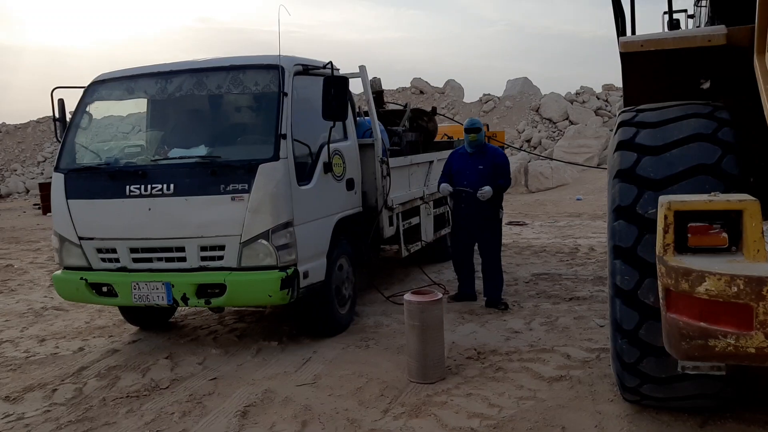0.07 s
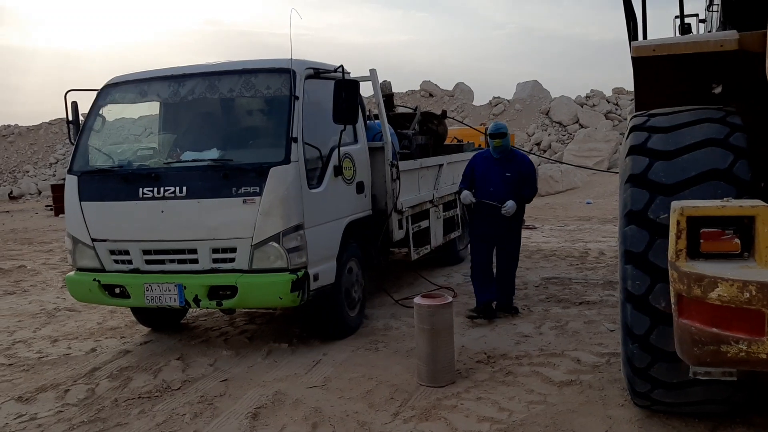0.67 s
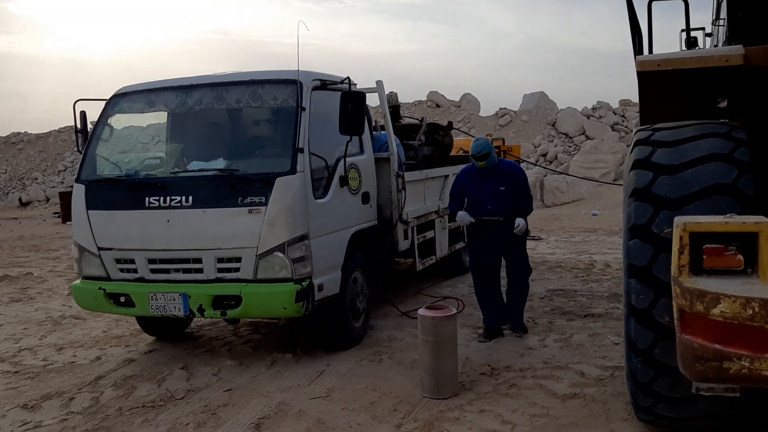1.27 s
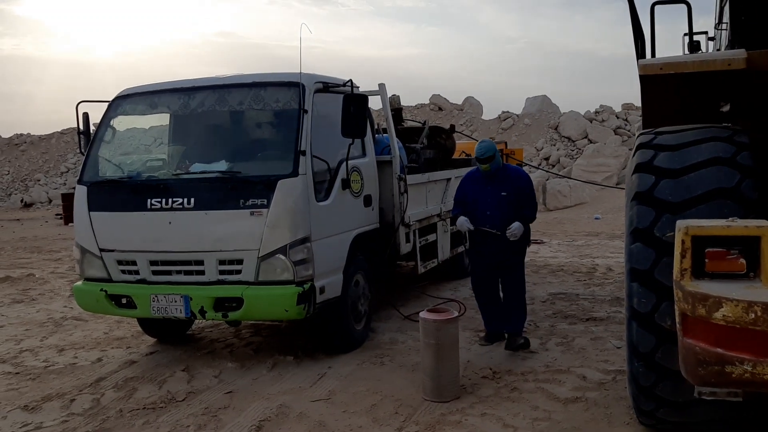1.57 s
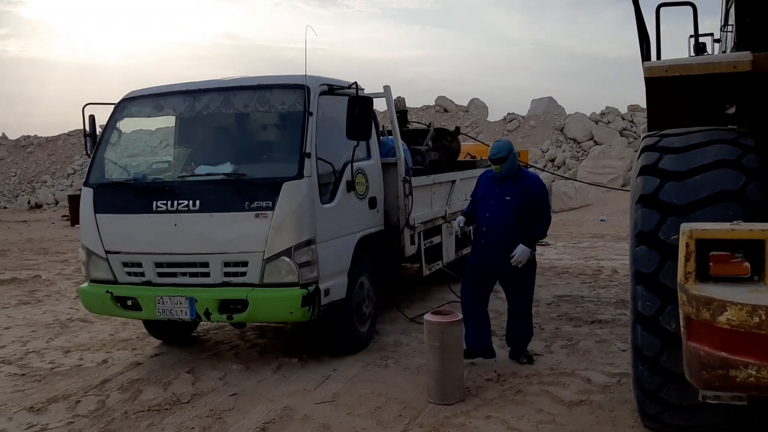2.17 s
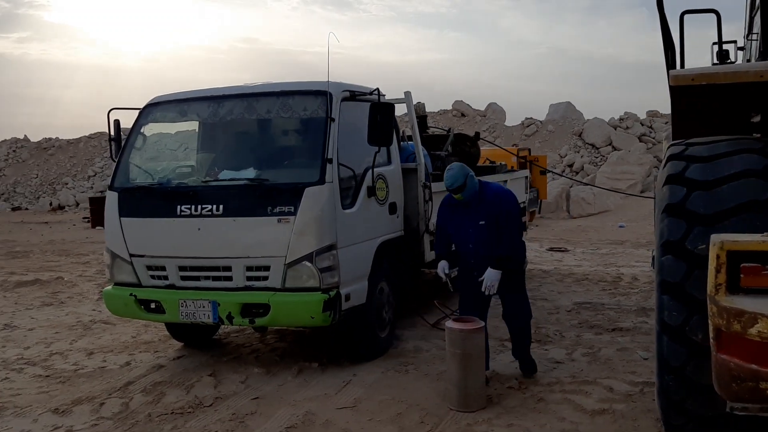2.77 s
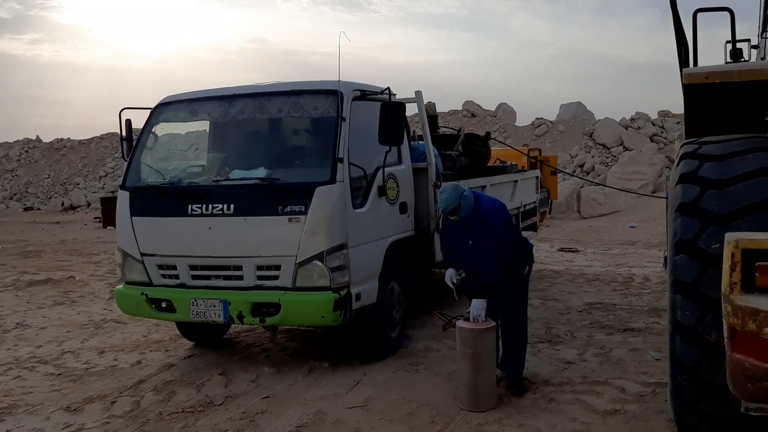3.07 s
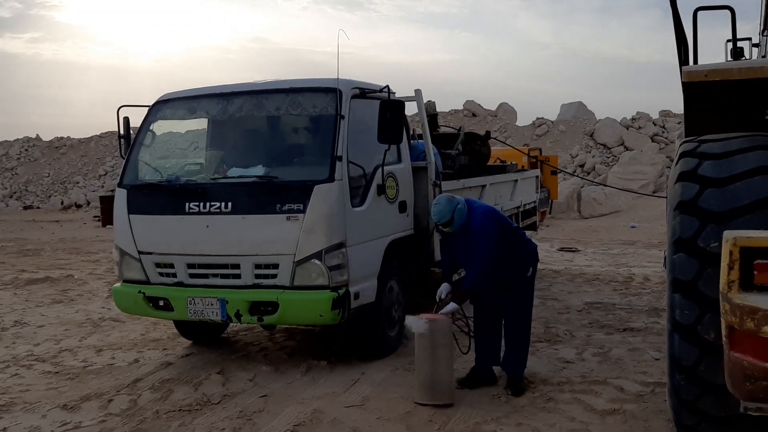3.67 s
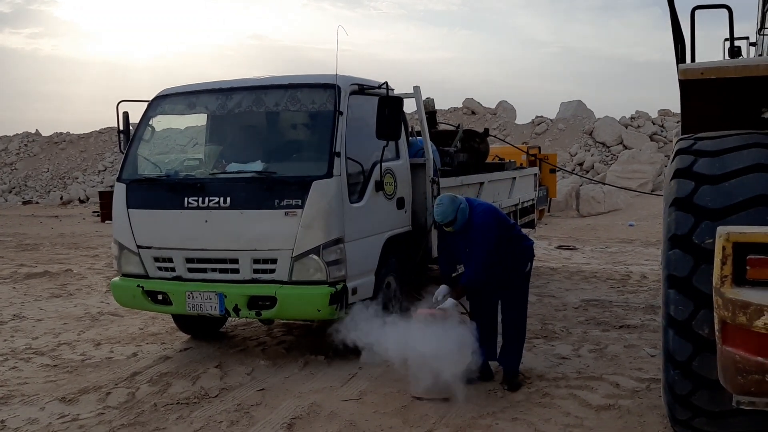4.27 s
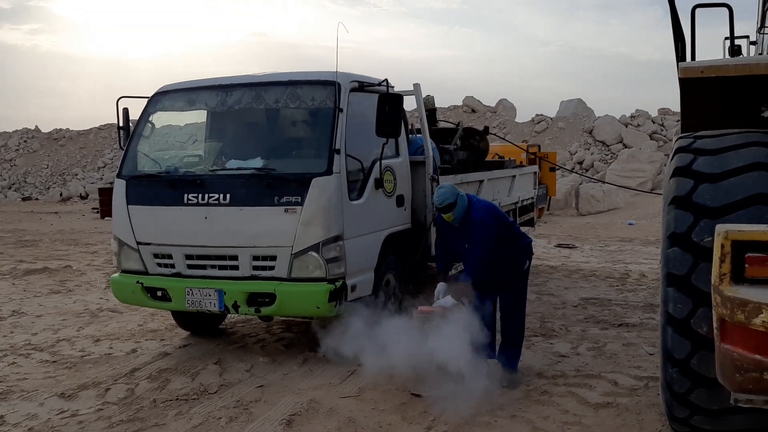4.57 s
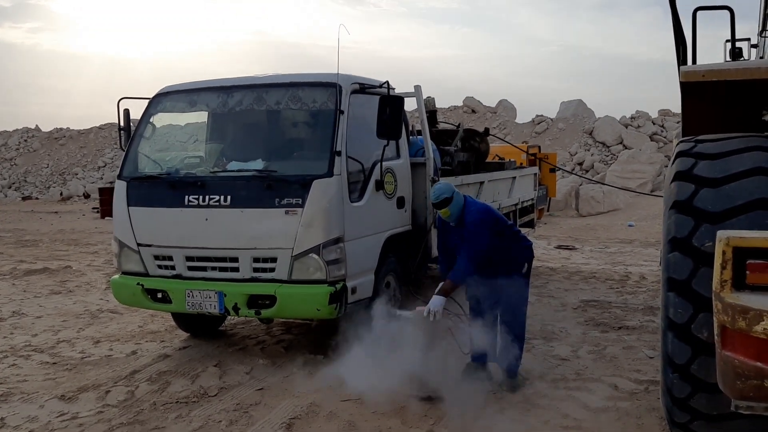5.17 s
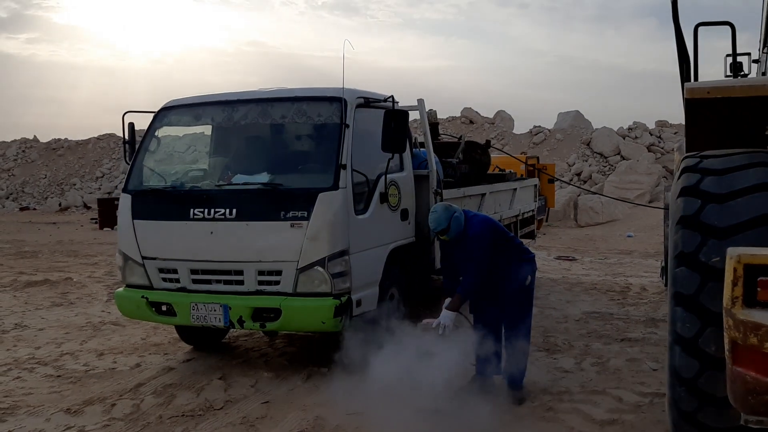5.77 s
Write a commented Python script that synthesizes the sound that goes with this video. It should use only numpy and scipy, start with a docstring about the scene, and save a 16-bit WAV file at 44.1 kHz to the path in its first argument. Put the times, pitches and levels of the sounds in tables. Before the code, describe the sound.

A diesel compressor drones and clatters steadily in an open quarry yard, with no echo. An air gun hisses in brief flares, with two small dry knocks on the ground to the right and a few short, hoarse whistles. The hiss grows louder as it nears the microphone. Then the jet goes into a pleated filter and pulses in quick, close strokes, muffled at each turn, while the engine gets louder.

```python
"""A spurt of air hisses over the drone of a six-cylinder diesel driving a screw compressor, out in an
open quarry yard. The air gun's turbulent jet swings about, whistles hoarsely where it grazes an edge and
is carried closer to the microphone; early on, two small knocks sound on the stony ground to the right.
Then the jet is aimed into a pleated air filter and worked up and down, and at each turn of the stroke
the filter swallows the hiss."""
import sys
import numpy as np
from scipy import signal
from scipy.fft import rfft, irfft, next_fast_len
from scipy.io import wavfile
from scipy.ndimage import uniform_filter1d, map_coordinates

SR = 44100
rng = np.random.default_rng(int(sys.argv[2]) if len(sys.argv) > 2 else 0)


def materialize(psi):
    """Save the field psi as 16-bit PCM at rate SR to the path in sys.argv[1].

    A 1-D psi becomes a single channel; in a 2-D psi each row is a channel.
    """
    bounded = np.clip(np.atleast_2d(psi).T, -1, 1)
    quanta = np.round(bounded * 32767).astype(np.int16)
    wavfile.write(sys.argv[1], SR, quanta)


N = 265041
TIME = np.arange(N) / SR
FFT_SIZE = next_fast_len(N + SR // 4)
FFT_HZ = np.fft.rfftfreq(FFT_SIZE, 1 / SR)
SIDES = np.array([[.5], [-.5]])  # splits a left-minus-right level between the channels


def amp(db):
    """Decibels to gain."""
    return np.exp(np.asarray(db) * (np.log(10) / 20))


def unit(x):
    """Scale to rms 1."""
    return x / np.sqrt(np.mean(x ** 2) + 1e-20)


def along(points):
    """Read (freq_hz, value) points across the spectrum, on a log axis."""
    hz, values = np.transpose(points)
    return np.interp(np.log(FFT_HZ + 1), np.log(hz + 1), values)


def curves(rows):
    """One value per sample for each column after the time."""
    times, *columns = np.transpose(rows)
    return [np.interp(TIME, times, column) for column in columns]


def step(at, width):
    """A smooth rise from 0 to 1 around a moment."""
    return .5 + .5 * np.tanh((TIME - at) / width)


def swell(at, width):
    """A smooth bump of height 1 around a moment."""
    return np.exp(-((TIME - at) / width) ** 2)


def wobble(rate):
    """A smooth random curve, rate knots a second."""
    coarse = TIME[::64]
    drift = map_coordinates(rng.standard_normal(1024), [coarse * rate], mode="wrap")
    return np.interp(TIME, coarse, drift)


def filtered(x, gain):
    """Apply one gain per frequency in FFT_HZ."""
    return irfft(rfft(x, FFT_SIZE) * gain, FFT_SIZE)[..., :N]


def delayed(x, ms):
    """x heard later by a time that may change."""
    return map_coordinates(x, [np.arange(N) - ms * SR / 1000], order=5)


# How alike the yard sounds on the two sides of the microphone: freq_hz, likeness
STEREO_LIKENESS = [(30, 0.33), (70, 0.9), (290, 0.94), (640, 0.83), (1400, 0.65), (3000, 0.36),
                   (8000, 0.13)]

def spread(pair, colour, lag_ms=0):
    """Colour two unrelated signals and mix them to a partly alike left and right, the left lag_ms late."""
    angle = np.arccos(along(STEREO_LIKENESS)) / 2
    mid, side = filtered(pair, amp(along(colour)) * [np.cos(angle), np.sin(angle)])
    left = filtered(mid + side, np.exp(-2j * np.pi * FFT_HZ * lag_ms / 1000))
    return unit(np.array([left, mid - side]))


def yard():
    """A faint, even hiss from all around the microphone."""
    colour = [(1200, -28), (2200, 4.0), (3100, 0.5), (4000, -2.5), (5200, -19),
              (7000, -21), (8500, -18), (10000, -14), (15000, -8)]  # freq_hz, gain_db
    return amp(-42.5) * spread(rng.standard_normal((2, N)), colour)


CYCLE_HZ, SCREW_HZ = 15.228, 255.7  # one engine cycle holds six firings; the screw's hum

def firing_noise(cycles, repeat, pulse_db):
    """Noise that swells at each of six firings; part of it repeats every engine cycle."""
    size = round(SR / CYCLE_HZ)
    position = (cycles % 1 * size).astype(int) % size
    pattern = rng.standard_normal((2, size))[:, position]
    noise = np.sqrt(repeat) * pattern + np.sqrt(1 - repeat) * rng.standard_normal((2, N))
    firing = np.cos(2 * np.pi * 6 * cycles) + np.cos(2 * np.pi * 12 * cycles)
    return noise * amp(pulse_db * firing)


# The machine from where the microphone stands, before layer gains: time_s, clatter_db, boom_db, exhaust_db
ENGINE_LEVELS = [(0.08, -42, -34.5, -33), (0.9, -38.0, -34, -34.5), (1.2, -35.5, -31.0, -29),
                 (1.55, -29.5, -25.5, -24.5), (1.78, -27, -23.5, -23), (1.88, -34, -29.5, -32.5),
                 (2.03, -33.5, -27, -30), (2.4, -33.0, -29.5, -26.5), (3.1, -33.0, -30.0, -31.0),
                 (3.9, -33, -28, -26.0), (4.4, -32.0, -28.5, -27.5), (4.8, -32.0, -28.0, -27.0),
                 (5.3, -26.5, -23.5, -21), (6.0, -25.5, -22, -22.5)]
# Engine tones beside the firing note: cycle_multiple, relative_db
ENGINE_ORDERS = [(3, -27), (5, -17), (9, -22), (10, -15), (12, -13), (16, -7), (18, -21), (20, -21),
                 (30, -27), (32, -25), (53, -26), (59, -24), (64, -28), (88, -28), (96, -25), (109, -30),
                 (117, -26)]
# Compressor and fan tones: pitch_hz, relative_db
SHAFT_HUM = [(41.4, -21), (85.2, -21)]
# Spectrum of the booming housing: freq_hz, gain_db
BOOM_COLOUR = [(25, -28), (36, -20), (45, -3.5), (70, -3), (110, 0.5), (150, -1), (230, 1.5), (270, -4.5),
               (330, -6), (450, -16.5), (800, -16), (2000, -72)]
# Spectrum of the diesel clatter: freq_hz, gain_db
CLATTER_COLOUR = [(150, -22), (330, -5), (440, -2.5), (510, -3), (610, -8), (760, 0), (1050, 0.5),
                  (1480, -0.5), (1750, -4.5), (2080, -0.5), (2700, -9.5), (5000, -16), (7000, -20),
                  (9200, -62), (15000, -30)]

def diesel_compressor():
    """Exhaust tones, the boom of the housing, diesel clatter and the hum of the compressor screw."""
    clatter_db, boom_db, exhaust_db = curves(ENGINE_LEVELS)
    run_s = TIME + .00012 * wobble(2.5)  # the governor lets the speed wander a little
    cycles = CYCLE_HZ * run_s

    def tone(hz):
        phase = 2 * np.pi * (hz * run_s + rng.random())
        return np.sqrt(2) * np.sin(phase) * amp(1.02 * wobble(4.07))

    exhaust = tone(6 * CYCLE_HZ) * amp(exhaust_db + 0.65 * wobble(9))
    orders = amp(-4.0) * sum(amp(db) * tone(k * CYCLE_HZ) for k, db in ENGINE_ORDERS)
    screw = amp(-11.0) * tone(SCREW_HZ) + amp(-22.5) * tone(2 * SCREW_HZ)
    shafts = sum(amp(db) * tone(hz) for hz, db in SHAFT_HUM)
    boom = amp(-5.5) * spread(firing_noise(cycles, repeat=0.12, pulse_db=0.16), BOOM_COLOUR)
    clatter = spread(firing_noise(cycles, repeat=0.25, pulse_db=.5), CLATTER_COLOUR, lag_ms=0.081)
    clatter *= amp(clatter_db + 2 + 0.75 * wobble(14))
    drone = exhaust + amp(boom_db + 3.5 + 0.21 * wobble(9)) * (orders + screw + shafts + boom)
    return drone * amp(-.4 * SIDES) + clatter * amp(-1.4 * SIDES)  # a little right of centre


# Dry knocks on the ground, right of the microphone: start_s, level_db, contact_s, left_minus_right_db
GROUND_KNOCKS = [(0.5568, -12, 0.00013, -20), (0.7237, -17, 0.000045, -16)]

def knocks():
    """Each knock is one short push of air and a brief gritty tail."""
    out = np.zeros((2, N))
    colour = [(200, -6), (900, 1), (2500, -8), (5000, -12), (9000, -23)]  # freq_hz, gain_db
    grit = spread(rng.standard_normal((2, N)), colour)
    for start, db, contact_s, pan_db in GROUND_KNOCKS:
        age = np.clip(TIME - start, -.002, .1)
        push = -np.exp(-.5 * (age / contact_s) ** 2)
        tail = amp(-60 * age / .024) * (age > 0)
        out += amp(db + pan_db * SIDES) * (push + amp(-16.5) * grit * tail)
    return out


# The jet grazes an edge, heard dead centre: start_s, end_s, first_hz, last_hz, nominal_width_hz, level_db
EDGE_TONES = [(0.813, 0.884, 2890, 2810, 800, -39.5), (0.873, 0.942, 2700, 2550, 350, -42),
              (0.989, 1.065, 2630, 2910, 400, -45), (2.633, 2.675, 2915, 3050, 1300, -35),
              (3.588, 3.628, 1994, 2050, 300, -28.5), (3.592, 3.632, 2700, 2800, 600, -33)]

def whistles():
    """Each edge tone is a narrow band of turbulence whose centre glides."""
    out = np.zeros(N)
    for start, end, first_hz, last_hz, width_hz, db in EDGE_TONES:
        pitch_hz = np.interp(TIME, [start, end], [first_hz, last_hz])
        phase = 2 * np.pi * np.cumsum(pitch_hz) / SR
        lowpass = signal.butter(2, 0.66 * width_hz, fs=SR)
        eddies = signal.lfilter(*lowpass, rng.standard_normal((2, N)))
        band = unit(eddies[0] * np.cos(phase) + eddies[1] * np.sin(phase))
        out += amp(db) * band * (step(start, 0.012) - step(end, .005))
    return out


def patchy(x, depth_db):
    """Turbulence brightens shifting patches of the spectrum."""
    spectra = signal.stft(x, nperseg=512)[2]
    patches = rng.standard_normal(spectra.shape[1:])
    for _ in range(2):
        patches = uniform_filter1d(patches, size=3, axis=0)  # across frequency
        patches = uniform_filter1d(patches, size=20, axis=1)  # across time
    return signal.istft(spectra * amp(depth_db * unit(patches)), nperseg=512)[1][:, :N]


# The jet's place before the microphone: time_s, left_lead_ms, likeness, left_minus_right_db
JET_PLACE = [(0.1, 0.006, 0.3, 3.5), (0.4, 0.17, 0.23, 5), (1.15, 0.14, 0.14, -3.5),
             (1.6, -0.03, 0.17, -2.5), (2.0, 0.015, 0.42, -.5), (2.8, 0.0049, 0.59, -0.2),
             (3.2, 0.023, 0.69, 0), (3.65, 0.059, 0.69, 0.5), (4.2, 0.049, 0.57, -1),
             (6.0, 0.058, 0.66, -1)]
# The side each band of the jet leans to: freq_hz, left_minus_right_db
JET_LEAN = [(1500, -2), (4400, -6.5), (6500, -6), (8500, 7.5), (11000, -2), (15000, 8)]

def jet(hiss_db, sizzle_db, colour, modes=(), flutter_db=0.78):
    """Turbulent air: a hiss and a finer sizzle above 9 kHz, whose level is relative to the hiss."""
    lead_ms, likeness, pan_db = curves(JET_PLACE)
    angle = np.arccos(likeness) / 2
    direct, scattered = rng.standard_normal((2, N)) * [np.cos(angle), np.sin(angle)]
    air = np.array([direct + scattered, delayed(direct - scattered, lead_ms)])
    resonance_db = sum(db / (1 + ((FFT_HZ - hz) / width) ** 2) for hz, width, db in modes)
    air = filtered(air, amp(along(colour) + resonance_db + along(JET_LEAN) * SIDES))
    low_band = filtered(air, 1 / (1 + (FFT_HZ / 9000) ** 24))
    hiss = unit(low_band) * amp(flutter_db * wobble(40))
    sizzle = unit(air - low_band) * amp(sizzle_db + flutter_db * wobble(40))
    return amp(hiss_db + flutter_db * wobble(60) + pan_db * SIDES) * (hiss + sizzle)


# The open jet, carried closer to the microphone: time_s, level_db
OPEN_HISS = [(0.2, -46), (0.98, -45), (1.08, -37.5), (1.62, -33), (1.79, -26.5), (2.1, -24.5), (2.6, -26.5),
             (2.68, -30.5), (2.76, -27), (3.6, -26), (3.67, -31.5)]
# Its sizzle against the hiss: time_s, relative_db
OPEN_SIZZLE = [(0.6, -1), (1.65, 0.5), (2.4, 3.5), (3.7, 6)]
# Its spectrum in the open air: freq_hz, gain_db
OPEN_COLOUR = [(800, -11.5), (2500, -12), (4000, -10), (5200, -3.5), (6800, 1.5), (7900, -1.5), (8700, -8),
               (9900, -9), (11000, -2.5), (12200, 4), (13600, 3.5), (15000, 1.5), (16000, -16)]
# The nozzle swings past the microphone: time_s, half_length_s, lift_db
NOZZLE_SWINGS = [(0.094, 0.053, 7), (0.285, 0.044, 5.5), (0.868, .035, 3.5), (1.477, .04, 2.5)]

def open_jet():
    """The jet grows as it nears, and is louder and brighter whenever it swings toward the microphone."""
    hiss_db, = curves(OPEN_HISS)
    sizzle_db, = curves(OPEN_SIZZLE)
    flare_db = sum(db * swell(at, width) for at, width, db in NOZZLE_SWINGS)
    sway_db = .45 * wobble(12)  # the hand is never quite still
    air = jet(hiss_db + flare_db + sway_db, sizzle_db + flare_db, OPEN_COLOUR)
    return patchy(air, depth_db=1.5)


# Strokes along the pleats, close by: start_s, end_s, hiss_db, relative_sizzle_db, turn_muffle_db
PLEAT_STROKES = [(3.742, 3.792, -28, -0.5, 14), (3.862, 3.974, -29, 1.5, 14), (4.021, 4.144, -29.5, 3, 12),
                 (4.193, 4.33, -30, -1, 13), (4.369, 4.507, -28.5, -2.5, 14), (4.547, 4.582, -29.5, 0, 3.5),
                 (4.655, 4.998, -26.5, -3, 6), (5.065, 5.185, -25.5, -2.5, 14),
                 (5.248, 5.358, -23, 0.5, 14), (5.41, 5.543, -21.5, 0, 15), (5.608, 5.731, -22, -0.5, 14),
                 (5.782, 5.932, -23, -3, 13), (5.966, 6.1, -24, -2, 14)]
# Spectrum of the jet in the pleats: freq_hz, gain_db
PLEAT_COLOUR = [(800, -19), (2500, -2.5), (3600, -8.5), (4700, -5), (5500, -2), (6050, 2), (6600, 2),
                (7700, -1), (8800, -10.5), (9700, -7), (11000, -3), (12200, -3), (13800, -3), (16000, -16)]
# Air resonances inside the filter's core: pitch_hz, half_width_hz, lift_db
CORE_MODES = [(5550, 220, 3.5), (6000, 110, -1), (6600, 180, 1.5), (7950, 130, 1), (12300, 330, 4)]
CHOKE_S, REOPEN_S = 0.0042, 0.0082  # how fast the hiss is cut at a turn, and how fast it returns
RIM_DB, RIM_S = 1.5, 0.021  # the flare just before a turn: lift, half length

def filter_jet(hiss_share):
    """Each stroke flares near its end and is choked at the turn; the hiss takes only a share of this."""
    starts, ends, levels, sizzles, depths = np.transpose(PLEAT_STROKES)
    edges = np.column_stack([starts, ends]).ravel()
    held = lambda values: np.interp(TIME, edges, np.repeat(values, 2))
    rim_db = RIM_DB * sum(swell(end - RIM_S / 2, RIM_S) for end in ends)
    turns_db = sum(db * (step(end, CHOKE_S) - step(restart, REOPEN_S))
                   for end, restart, db in zip(ends, starts[1:], depths))
    entry_db = 7 * (1 - step(starts[0], REOPEN_S))  # muffled until the first stroke
    muffle_db = turns_db - rim_db + entry_db
    hiss_db = held(levels) - hiss_share * muffle_db
    sizzle_db = held(sizzles) - (1 - hiss_share) * muffle_db
    return patchy(jet(hiss_db, sizzle_db, PLEAT_COLOUR, CORE_MODES), depth_db=1.65)


def air_gun():
    """The jet blows free over the ground, then into the filter."""
    inside = step(at=3.712, width=0.0073)
    return (1 - inside) * open_jet() + inside * filter_jet(hiss_share=0.69)


def scene():
    """Everything reaches the microphone through open air, with no room."""
    return diesel_compressor() + air_gun() + whistles() + knocks() + yard()


START_S, TOP_HZ = 0.069, 15900

def record(dry):
    """The microphone opens after a moment and passes nothing above its band limit."""
    return filtered(dry * (TIME > START_S), FFT_HZ < TOP_HZ)


dry = scene()
out = record(dry)
materialize(out)
```